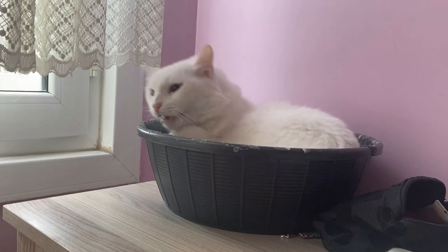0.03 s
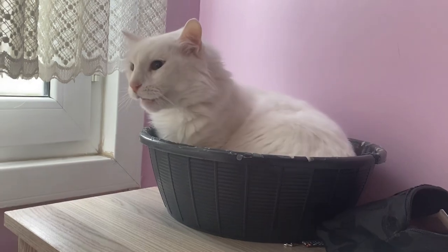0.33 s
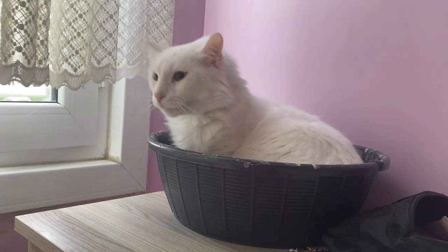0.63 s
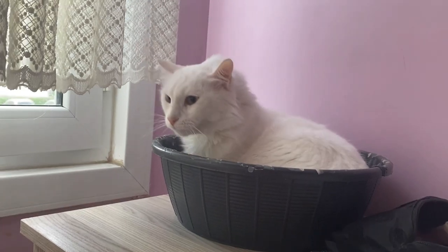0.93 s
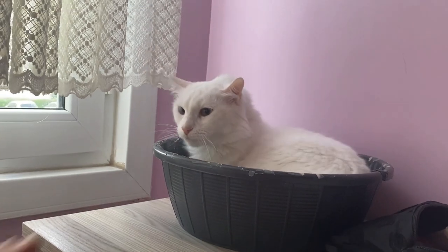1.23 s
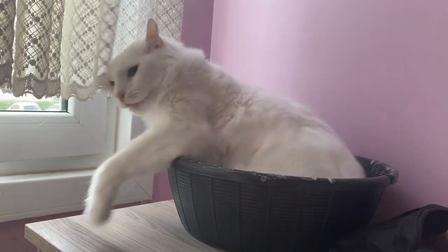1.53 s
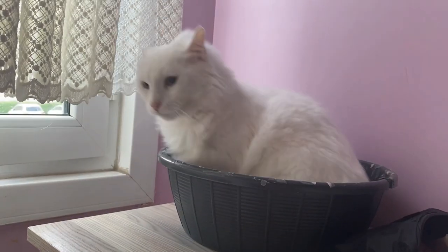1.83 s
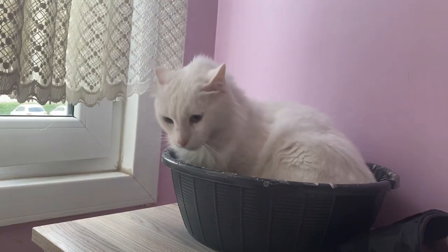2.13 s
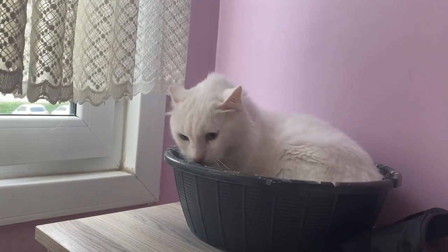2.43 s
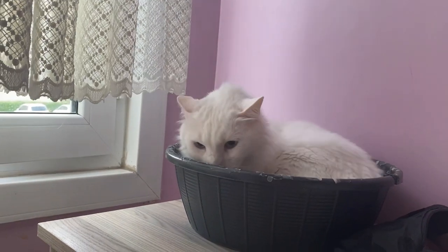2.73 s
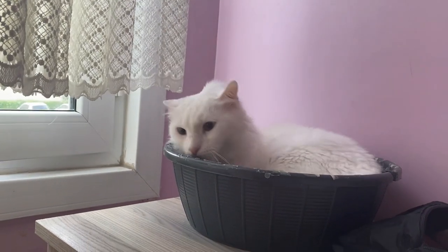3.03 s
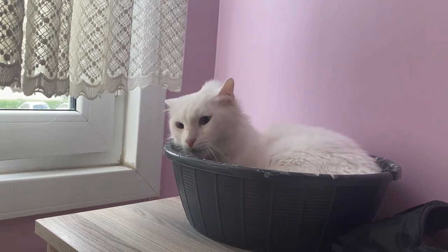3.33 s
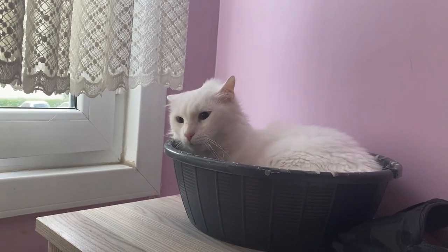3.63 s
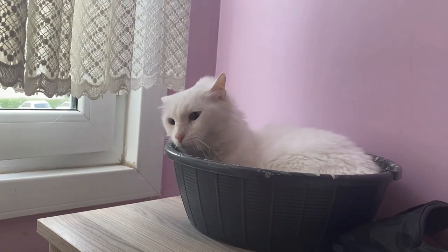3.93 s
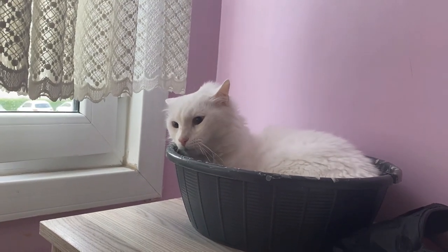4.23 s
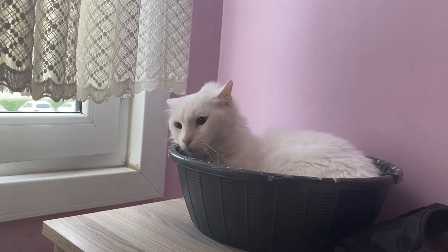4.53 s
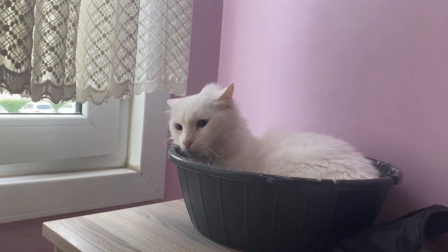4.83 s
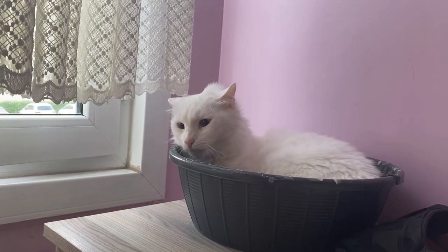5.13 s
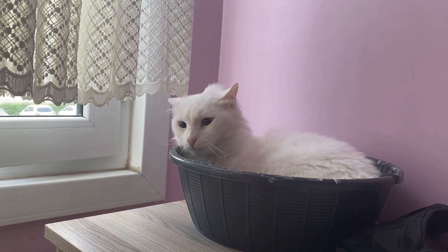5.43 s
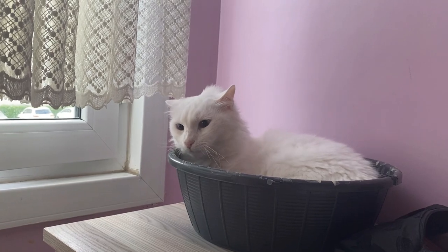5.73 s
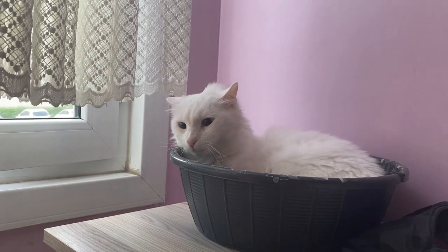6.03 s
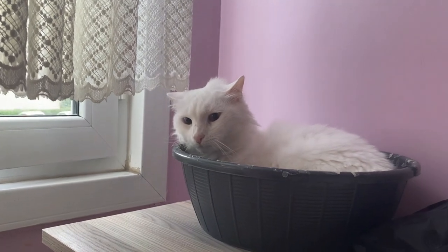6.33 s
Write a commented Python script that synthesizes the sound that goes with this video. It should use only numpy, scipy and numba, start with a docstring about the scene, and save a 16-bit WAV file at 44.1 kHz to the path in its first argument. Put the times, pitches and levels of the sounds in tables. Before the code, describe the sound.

A cat hisses, moans and sinks into a long, low, rattling growl, with a few thumps and claw ticks on a plastic tub.

```python
"""Cat growling in a plastic tub.

A cat in a tub on a table, in a small room, hisses, moans and sinks into a long rattling growl. One pair
of vocal folds slaps for the growl, sings the moan and chops the hiss. The cat swipes a paw and drops
back: the tub thumps, claws tick on the rim, fur rubs the wall. Faint traffic rumbles through the window."""
import sys
import numpy as np
from scipy import signal
from scipy.fft import rfft, irfft
from scipy.io import wavfile
from scipy.ndimage import uniform_filter1d
from numba import njit

SR = 44100
rng = np.random.default_rng(int(sys.argv[2]) if len(sys.argv) > 2 else 0)


def store_wav(level_fs):
    """Save 16-bit WAV to argv[1]."""
    pcm = np.round(np.clip(np.atleast_2d(level_fs), -1, 1) * 32767)
    wavfile.write(sys.argv[1], SR, pcm.T.astype(np.int16))


N = 280917
T = np.arange(N) / SR

# folds, snarl to low rattle to stall: (time [s], pulse rate [Hz], level [dB])
FOLDS = [(.058, 68.4, -48), (.2, 81.75, -46.5), (.35, 86.16, -46.5), (.6, 85.27, -46.5), (.66, 68.65, -46),
         (.78, 61.03, -49.5), (1.12, 60.75, -46.5), (1.35, 66.72, -45.5), (1.55, 65.07, -47.5),
         (1.85, 50.28, -47), (1.98, 50.74, -50), (2.18, 48.67, -51), (2.4, 49.85, -52.5),
         (2.88, 50.48, -50.5), (3.12, 49.64, -52.5), (3.27, 50.08, -48.5), (3.44, 51.13, -51.5),
         (3.51, 53.6, -48.5), (3.72, 52.23, -47.5), (3.9, 50.99, -52), (4.07, 48.24, -52),
         (4.36, 47.46, -51.5), (4.77, 47.6, -54.5), (4.84, 43.9, -77)]
# throat: (time [s], resonance [Hz], lift [dB], mouth opening [0-1], roughness [ratio])
THROAT = [(.1, 182.7, 12, 0.88, 0.7), (.4, 175, -1.5, 0.9, 1.5), (.8, 193.5, 2, 0.8, 0.3),
          (1.15, 200.2, 0.5, 0.7, 0.26), (1.4, 157.5, 4.5, 1, 0.8), (1.9, 152.3, 3, .3, 0.5),
          (2.2, 141, 7.5, 0, 0.1), (2.8, 148, 2, 0, 0.27), (3.15, 142.2, 2.5, 0, 0.2),
          (3.35, 192, 3.5, 0.7, 0.17), (3.6, 214, 6.5, 0.27, 0.2), (3.9, 190, 4.5, 0, 0.4),
          (4.1, 200.6, 9.5, 0.4, 0.14), (4.75, 228.7, 9.5, 0.25, 0.2)]


def growl(cycles, effort_db, gape, jitter_s=.0007, shimmer_db=3, rebound_db=-17, rasp=.065):
    """Slack folds slap shut and spring open, ringing chest, throat and mouth; air leaks after each slap."""
    # chest, throat and closed muzzle: (frequency [Hz], gain [dB])
    muzzle = [(25, -25.5), (55, -6.5), (100, -1.5), (155, 4), (200, 0), (245, -5.5), (298, -13.5),
              (355, -11.5), (410, -12), (510, -13.5), (590, -24), (950, -39), (1250, -47), (4000, -62.5)]
    # mouth resonance, moved by tongue and jaw: (time [s], frequency [Hz])
    mouth = [(.1, 400), (.42, 425), (.63, 470), (.8, 385), (1.1, 410), (1.4, 410), (1.9, 355), (2.3, 345),
             (2.6, 362), (3.2, 355), (3.7, 392), (3.9, 365), (4.7, 385)]
    throat_hz, throat_db, opening, rough = curve(THROAT)
    opening = opening + gape
    rough = np.abs(rough) * np.clip(1 - gape, .4, 1)  # pushing hard steadies the folds
    edges = np.flatnonzero(np.diff(np.floor(2 * cycles)))
    jitter, shimmer = rng.standard_normal((len(edges), 2)).T * rough[edges]
    onsets = np.clip(edges + (jitter * jitter_s * SR).astype(int), 0, N - 1)
    # half a cycle after each slap the folds part: a weaker, opposite pulse
    strokes = np.where(np.arange(len(edges)) % 2, 1, -undb(rebound_db))
    pulses = np.zeros(N)
    pulses[onsets] = strokes * undb(shimmer_db * shimmer)
    leak = noise() * np.exp(-1.2 * (cycles % 1)) * np.sqrt(2 * rough)
    slaps = colour(pulses, [(600, -6.5), (1200, -20), (3000, -30)])  # soft: the treble is mostly air
    breath = rasp * colour(leak, [(450, -7.5), (700, -2), (1200, 1)])
    voice = lift(colour(slaps + breath, muzzle), throat_hz, 59, throat_db)
    mouth_hz = curve(mouth)[0] * (1 + .025 * walk(14))
    voice = lift(voice, mouth_hz, width_hz=35, db=7)
    voice = lift(voice, .98 * mouth_hz, width_hz=64, db=5)
    voice = lift(voice, 640, 300, 5 * opening)  # a wider mouth lets more overtones out
    voice = lift(voice, 750, 390, 9 * opening)
    voice = lift(voice, 1250, 330, 15 * gape)  # pushing hard wakes the next resonance
    return steady(scatter(voice)) * voiced() * undb(effort_db + 1.5)


def effort(let_go_s=.08, gape_per_db=.33, catch_sigma_s=.01282, catch_hz_per_db=.52):
    """Drive of the folds, with surges and catches: pulse rate [Hz], level [dB], extra mouth opening."""
    # surges of effort: (peak [s], build-up [s], pitch rise [Hz], gain [dB])
    surges = [(0.099, .02, 0.5, 2.5), (1.289, 0.033, 14, 1), (1.393, 0.029, 17, 2), (2.733, 0.32, 3.5, 0),
              (3.001, .11, 3.5, 1), (3.384, .081, 2.5, 0.5), (3.741, .29, 6, 2), (4.481, 0.068, 4, 0)]
    # the rattle catches for a cycle or two: (time [s], dip [dB])
    catches = [(1.87, 6), (1.991, 3.5), (2.079, 5.5), (2.199, 5.5), (2.293, 6.5), (2.384, 7), (2.823, 5.5),
               (3.27, 3), (3.835, 7.5), (4.443, 8), (4.564, 7.5)]
    pulse_hz, level_db = curve(FOLDS)
    push_db = 0
    for peak_s, build_s, rise_hz, gain_db in surges:
        surge = np.interp(T, [peak_s - build_s, peak_s, peak_s + let_go_s], [0, 1, 0])
        pulse_hz = pulse_hz + rise_hz * surge
        push_db = push_db + gain_db * surge
    dip_db = sum(db * bell(at_s, catch_sigma_s) for at_s, db in catches)
    return pulse_hz - catch_hz_per_db * dip_db, level_db + push_db - dip_db, gape_per_db * push_db


def voiced(fade_s=.023):
    """Gate: 1 while the folds vibrate."""
    return np.clip(np.minimum(T - FOLDS[0][0], FOLDS[-1][0] + fade_s - T) / fade_s, 0, 1)


def moan(cycles, gain_db=-2, overtone_db=-12, waver_db=.5):
    """Tensed folds sing a near-pure tone an octave above the rattle; roughness removes its overtone."""
    # (start [s], length [s], level [dB], sag [dB/s])
    swells = [(.085, 0.039, -28.5, 30), (.16, 0.1, -37, 45), (.635, 0.016, -43, -2), (.685, 0.074, -26, 3),
              (.81, .14, -28, 4), (1.0, 0.17, -32, 5), (1.19, .075, -24, 4), (1.295, .01, -31, -2),
              (1.345, 0.049, -24.5, 13)]
    phase = 4 * np.pi * cycles
    clean = np.clip(1 - curve(THROAT)[3], 0, 1)
    tone = np.sin(phase) + undb(overtone_db) * clean * np.sin(2 * phase)
    gain = envelopes(swells, attack_s=.056, release_s=.037) * voiced()
    return tone * gain * undb(gain_db - waver_db * walk(49))


def hiss(cycles, gain_db=-4, spray_db=-21, throb=2.2, flutter_db=1.6):
    """Air rushes through the bared mouth or spits through narrowed lips, chopped by folds and spittle."""
    # hisses, and spits just before the swipe: (start [s], length [s], level [dB], sag [dB/s])
    hisses = [(0, 0.0047, -53.5, 115), (.078, 0.0075, -52, 0), (.103, 0.21, -45, 52),
              (.39, .4, -57.5, 33.5)]
    spits = [(1.366, 0.01906, -67, -4.5), (1.396, 0.0087, -58.5, 44)]
    # bared and narrowed mouth: (frequency [Hz], nominal width [Hz], gain [dB])
    jaw_modes = [(850, 89, 14.5), (1350, 126, 9.5), (1730, 520, -11), (2620, 193, 3), (5320, 200, -5.5),
                 (6560, 570, -14.5), (7770, 880, -9.5), (11100, 1400, -21.5), (15000, 1400, -18.5)]
    lip_modes = [(2450, 130, 3.5), (3042, 170, -12.5), (3830, 350, 0.5), (5140, 340, -1), (6790, 300, -4.5),
                 (7700, 540, -3.5), (14900, 1026, -12)]
    # the jaws ease shut, lowering their modes: (time [s], frequency scale [ratio])
    jaw_glide = [(.11, 0.96), (.2, 0.96), (.35, 0.89), (.7, 0.93)]
    air = noise() * np.exp(-throb * (2 * cycles % 1)) * undb(flutter_db * walk(130))
    spray = undb(spray_db) * noise_band(4500, 6400)
    bared = unit(cavity(air, jaw_modes, curve(jaw_glide)[0])) + spray
    bared *= envelopes(hisses, attack_s=.029, release_s=.058)
    narrowed = unit(cavity(air, lip_modes)) + spray
    narrowed *= envelopes(spits, attack_s=.045, release_s=.041)
    return (bared + narrowed) * undb(gain_db)


def teeth(effort_db, leak_hz=3620, width_hz=330, leak_db=-50, whistle_db=-6.5):
    """Air sings at the teeth: faintly throughout the growl, and in short gliding whistles."""
    # (start [s], length [s], level [dB], sag [dB/s], first [Hz], last [Hz])
    whistles = [(0.13, 0.049, -57, 151, 5000, 5100), (0.55, 0.12, -70, -31, 4045, 3670),
                (0.69, 0.083, -73, 43, 3650, 3330), (3.473, 0.041, -81.5, 1, 4013, 4023),
                (3.607, 0.35, -91, 8, 3522, 3600)]
    out = noise_band(leak_hz, width_hz) * voiced() * undb(effort_db + leak_db)
    for start_s, length_s, db, sag, first_hz, last_hz in whistles:
        hz = np.interp(T, [start_s, start_s + length_s], [first_hz, last_hz])
        gain = envelope(start_s, length_s, db + whistle_db, sag, attack_s=.018, release_s=.2)
        out += noise_band(hz, width_hz) * gain
    return out


def huffs():
    """Short puffs of air through the nose."""
    # (time [s], level [dB], sigma [s], centre [Hz], width [Hz])
    puffs = [(3.755, -65.5, 0.01, 1983, 5300), (3.964, -86.5, 0.029, 2118, 1000),
             (4.148, -80.5, 0.011, 2003, 701), (4.352, -78, 0.033, 2078, 553)]
    return sum(undb(db) * bell(at_s, sigma_s) * noise_band(hz, width_hz)
               for at_s, db, sigma_s, hz, width_hz in puffs)


def tub_thumps(scuff_db=-25, scuff_s=.0087):
    """Blows ring the tub's modes, soft contacts only the low ones; the base then scuffs the table."""
    # tub on the table: (frequency [Hz], t60 [s], level [dB])
    modes = [(58.03, .48, -19), (113.2, .18, -3), (262, 0.095, -2.5), (345, .15, -10.5), (492, 0.027, 3.5),
             (513, .07, 4), (587, 0.031, 8), (878, .06, -10), (968, .05, -6.5), (1120, 0.046, -10.5),
             (1203, .04, -5.5), (1393, .035, -7.5), (1700, .03, -11.5), (2108, .025, -21.5)]
    # (time [s], level [dB], contact [s])
    blows = [(.264, -36.5, .00013), (1.4516, -34, 0.0011), (1.459, -21.5, .007), (1.467, -26, 0.00029),
             (1.5445, -13, 0.0006), (1.559, -27, 0.0029), (1.589, -32, 0.0014), (1.613, -27, 0.0074),
             (1.704, -32.5, 0.0018), (1.777, -33.5, 0.0048)]
    t = T[:SR // 2]
    ring = sum((-1) ** k * undb(db - 60 * t / t60_s) * np.sin(2 * np.pi * hz * t)
               for k, (hz, t60_s, db) in enumerate(modes))
    out = np.zeros(N)
    for at_s, db, contact_s in blows:
        force = np.hanning(max(int(contact_s * SR), 5))
        thump = signal.fftconvolve(ring, force)[:len(t)]
        scuff = noise_band(1127, 2900)[:len(t)] * np.exp(-t / scuff_s)
        i = int(at_s * SR)
        out[i:i + len(t)] += undb(db) * (thump / np.abs(thump).max() + undb(scuff_db) * scuff)
    return out


def claw_ticks(gain_db=2, treble_db=5):
    """Claws and hairs snag on the rim: short cracks and longer rustles."""
    # (time [s], peak [dB], decay [s], body [dB])
    snags = [(0.239, -37, 0.0021, 4), (0.2624, -33.5, 0.002, -7), (0.706, -51, 0.0025, 6),
             (1.18, -58.5, 0.0051, -5), (1.28, -47.5, 0.013, 6.5), (1.563, -38, 0.015, -2),
             (1.641, -42.5, .008, -24), (1.707, -39.5, 0.0053, -6), (1.768, -49, 0.0011, -7),
             (1.781, -30, 0.0021, -2), (2.0922, -51, 0.0034, -1), (2.363, -54, 0.0048, 2),
             (2.642, -55, 0.0067, -2), (3.158, -54.5, 0.016, -10), (4.3894, -59.5, 0.014, 3),
             (5.527, -64.5, .006, -15), (5.565, -65.5, 0.017, -10)]
    # colour of a tick: (frequency [Hz], gain [dB])
    spectrum = [(590, -50), (1000, -15.5), (1340, -14.5), (1730, -8), (2010, -19), (2330, -6), (3150, -9.5),
                (4210, -10), (4620, -15.5), (7620, -14), (8750, -26), (11200, -21.5), (16000, -35.5)]
    t = T[:SR // 10]
    out = np.zeros(N)
    for at_s, db, decay_s, body_db in snags:
        burst = rng.standard_normal(len(t)) * np.exp(-t / decay_s)
        crack = colour(colour(burst, spectrum), [(2400, body_db), (4200, .0071), (11000, treble_db)])
        i = int(at_s * SR)
        out[i:i + len(t)] += undb(db + gain_db) * crack / np.abs(crack).max()
    return out


def fur_rubs(gain_db=-7, grain_db=4, catch_db=4, crackles_per_s=260, crackle_db=-8):
    """Hairs catch and slip on the plastic in dense tiny grains, a few with a bright crackle."""
    # fur and paws on the tub: (start [s], length [s], level [dB], sag [dB/s], treble lift [dB])
    strokes = [(0.243, .029, -48, 109, -0.5), (0.439, 0.004, -52, -10, 0), (1.168, 0.22, -69.5, -20, 2),
               (1.481, 0.017, -44, 91, -1), (1.58, 0.082, -56, 42, 2.5), (1.687, 0.67, -60.5, 60, -0.5),
               (2.07, 0.094, -65.5, 18, -1), (2.328, 0.1, -69, 45, 2), (2.549, 0.12, -75.5, -8, 0),
               (2.72, 0.13, -69, 29, 2.5), (2.97, 0.044, -71, 20, -2), (3.173, 0.052, -64, 126, -0.5),
               (3.657, 0.053, -80.5, 5, 9.5)]
    # dry, bright rustle of fur, with a narrow notch in the filter near 13.5 kHz: (frequency [Hz], gain [dB])
    spectrum = [(530, -58), (900, 1), (1590, -6), (2190, -6), (5960, -13.5), (6800, -9.5), (8980, -21.5),
                (11300, -15), (13500, -30), (14900, -18), (16000, -22.5)]
    slips = noise() * undb(grain_db * walk(1500) + catch_db * walk(90))
    clicks = (rng.random(N) < crackles_per_s / SR) * noise()
    crackle = unit(colour(clicks, [(1000, -15.5), (5000, -2.5), (11000, 0), (15000, 7.5)]))
    friction = unit(colour(slips, spectrum)) + undb(crackle_db) * crackle
    out = sum(lift(friction, 5500, 5000, treble_db) * envelope(*stroke, attack_s=.058, release_s=.12)
              for *stroke, treble_db in strokes)
    return out * undb(gain_db)


def scatter(x, lag_s=.0066, feedback=.3):
    """All-pass: echoes between tub and wall spread each pulse in time, colour unchanged."""
    delay = np.exp(-2j * np.pi * lag_s * SR * np.arange(N + 1) / (2 * N))
    return irfft(rfft(x, 2 * N) * (delay - feedback) / (1 - feedback * delay))[:N]


def room(x, left_db, t60_s=.28, gap_s=.0016, wet_db=-1, mid_db=0):
    """Direct sound reaches the left first; near walls scatter a tail, part common, part opposed."""
    # diffuse sound: (frequency [Hz], gain [dB])
    spectrum = [(60, -32.5), (150, 1.5), (300, -6), (600, 3), (1200, 8), (2500, 12), (6000, 7.5),
                (15000, -2)]
    t = T[:SR // 2]
    tails = rng.standard_normal((2, len(t))) * undb(-60 * t / t60_s) * (t > gap_s)
    responses = [colour(tail / np.linalg.norm(tail), spectrum) for tail in tails]
    mid, side = (signal.fftconvolve(x, response)[:N] for response in responses)
    wet = (undb(mid_db) * mid + np.array([side, -side])) / np.sqrt(2)
    direct = np.array([x, np.pad(x, (2, 0))[:N]])
    return (direct + undb(wet_db) * wet) * pan(left_db)


def traffic(gain_db=-62.5, wander_db=.15, side_db=-1):
    """Rumble behind the closed window, near mono in the bass, under a thin even hiss."""
    # rumble and hiss: (frequency [Hz], gain [dB])
    spectrum = [(12, -52), (20, -31.5), (39, -1.5), (60, 2), (81, -13), (138, -12.5), (222, -23),
                (377, -26.5), (446, -28.5), (499, -29), (949, -29), (1150, -37), (4060, -43.5),
                (13200, -59), (16000, -48)]
    mid, side = (unit(colour(noise() * undb(wander_db * walk(21)), spectrum)) for _ in range(2))
    side = colour(side, [(60, -9), (150, -8), (400, -1.5), (1500, -.5)]) * undb(side_db)
    return np.array([mid + side, mid - side]) * undb(gain_db) * pan(left_db=2)


def undb(db):
    """Decibels to gain."""
    return 10 ** (np.asarray(db) / 20)


def unit(x):
    """Scale to rms 1."""
    return x / np.sqrt(np.mean(x ** 2))


def pan(left_db):
    """Stereo gains, left above right by left_db."""
    return undb(np.array([[left_db], [-left_db]]) / 2)


def steady(x, window_s=.64):
    """Level out the slow rms of the middle band, keeping single pulses."""
    middle = signal.sosfilt(signal.butter(4, [190, 620], "bandpass", fs=SR, output="sos"), x)
    slow_power = np.abs(uniform_filter1d(middle ** 2, int(window_s * SR)))
    return x / np.sqrt(slow_power + np.mean(middle ** 2) / 100)


def curve(rows):
    """Each table column, interpolated linearly in time."""
    times_s, *columns = np.transpose(rows)
    return [np.interp(T, times_s, column) for column in columns]


def bell(at_s, sigma_s):
    """Gaussian of height 1."""
    return np.exp(-.5 * ((T - at_s) / sigma_s) ** 2)


def envelope(start_s, length_s, db, sag_db_per_s, attack_s, release_s):
    """Rise, sagging hold and decay; attack and release are times per 20 dB."""
    fade = np.maximum(start_s - T, 0) / attack_s + np.maximum(T - start_s - length_s, 0) / release_s
    return undb(db - sag_db_per_s * np.clip(T - start_s, 0, length_s) - 20 * np.minimum(fade, 10))


def envelopes(rows, attack_s, release_s):
    """Sum of one envelope per row."""
    return sum(envelope(*row, attack_s, release_s) for row in rows)


def noise():
    """White noise."""
    return rng.standard_normal(N)


def noise_band(hz, width_hz):
    """Band of noise, rms 1."""
    return unit(resonate(noise(), hz, width_hz))


def walk(rate_hz):
    """Smooth random drift, rms 1."""
    step = max(int(SR / rate_hz), 1)
    return unit(uniform_filter1d(np.repeat(noise()[:N // step + 1], step), step)[:N])


def colour(x, points, size=8192):
    """Minimum-phase filter through (frequency [Hz], gain [dB]) points."""
    hz, db = np.transpose(points)
    bins_hz = np.maximum(np.arange(size // 2 + 1) * SR / size, 1)
    cepstrum = irfft(np.log(undb(np.interp(np.log(bins_hz), np.log(hz), db))))
    cepstrum[1:size // 2] *= 2
    cepstrum[size // 2 + 1:] = 0
    return signal.fftconvolve(x, irfft(np.exp(rfft(cepstrum))))[:len(x)]


@njit
def svf(x, hz, width_hz):
    """State-variable band-pass with a moving centre."""
    y, band_state, low_state = np.empty(len(x)), 0., 0.
    for i in range(len(x)):
        g, damping = np.tan(np.pi * hz[i] / SR), width_hz / hz[i]
        band = (band_state + g * (x[i] + 1e-18 - low_state)) / (1 + g * (g + damping))
        band_state, low_state = 2 * band - band_state, low_state + 2 * g * band
        y[i] = damping * band
    return y


def resonate(x, hz, width_hz):
    """Band-pass applied twice, for steep skirts."""
    hz, width_hz = hz + np.zeros(N), float(width_hz)
    return svf(svf(x, hz, width_hz), hz, width_hz)


def lift(x, hz, width_hz, db):
    """A moving resonance raises its band by db."""
    return x + (undb(db) - 1) * svf(x, hz + np.zeros(N), float(width_hz))


def cavity(x, modes, glide=1):
    """Parallel resonances of alternating sign that glide together."""
    return sum((-1) ** k * undb(db) * resonate(x, hz * glide, 2 * width_hz)
               for k, (hz, width_hz, db) in enumerate(modes))


def scene(waver=.012):
    """One pair of folds drives growl, moan and hiss; knocks on the tub sound drier than the voice."""
    pulse_hz, effort_db, gape = effort()
    cycles = np.cumsum(pulse_hz * (1 + waver * walk(25))) / SR
    voice = growl(cycles, effort_db, gape) + moan(cycles)
    voice = room(voice, left_db=2.5, t60_s=.19, wet_db=-2.5, mid_db=1.5)
    air = hiss(cycles) + teeth(effort_db) + huffs()
    air = room(air, left_db=1.5, t60_s=.17, wet_db=-2.5, mid_db=2)
    thumps = room(tub_thumps(), left_db=3.5, wet_db=-8)
    ticks = room(claw_ticks(), left_db=5.5, wet_db=-14.5)
    fur = room(fur_rubs(), left_db=0)
    return voice + air + thumps + ticks + fur + traffic()


def record(dry, low_hz=36, top_hz=15850):
    """The microphone sheds the deepest bass and cuts off steeply at the top."""
    thinned = signal.sosfilt(signal.butter(3, low_hz, "highpass", fs=SR, output="sos"), dry)
    return signal.sosfilt(signal.ellip(10, .2, 70, top_hz, fs=SR, output="sos"), thinned)


dry = scene()
out = record(dry)
store_wav(out)
```